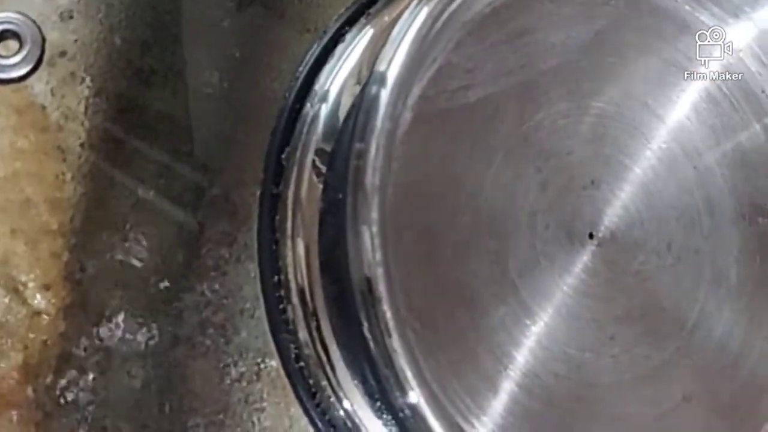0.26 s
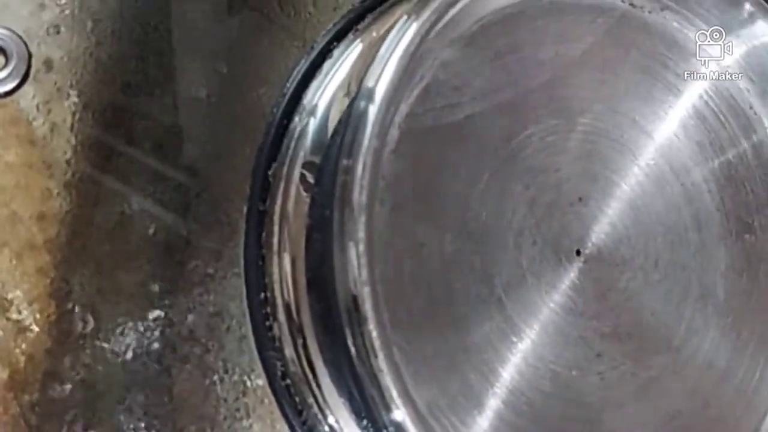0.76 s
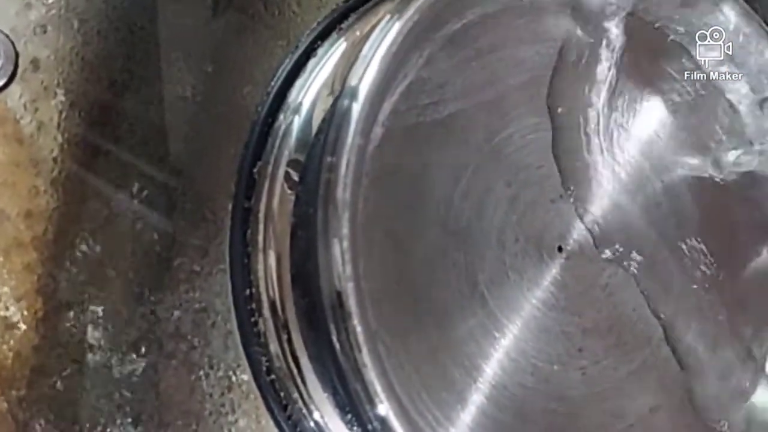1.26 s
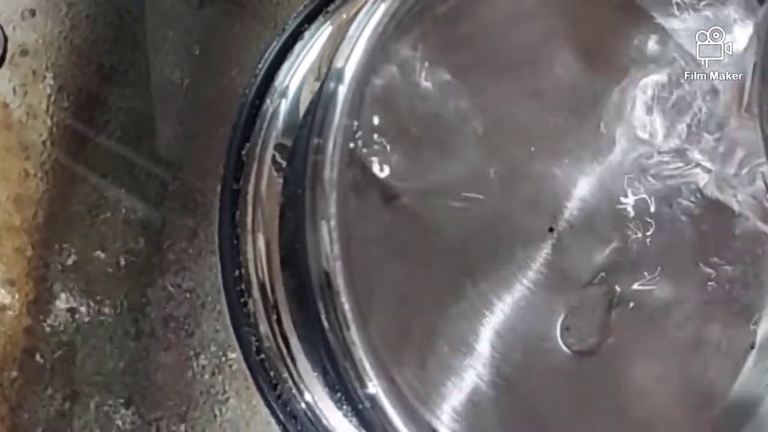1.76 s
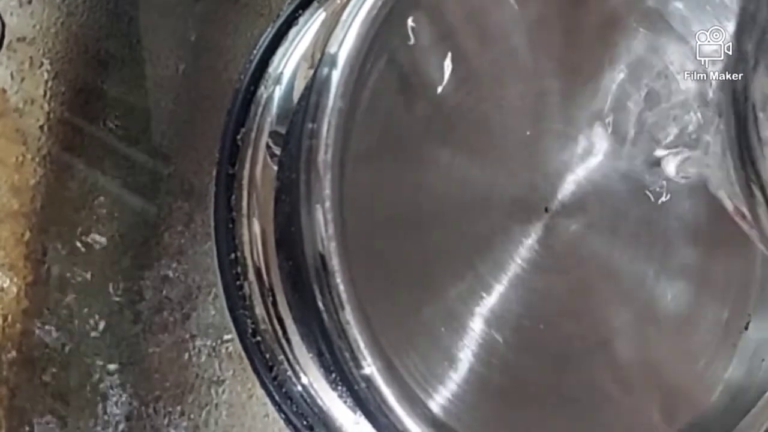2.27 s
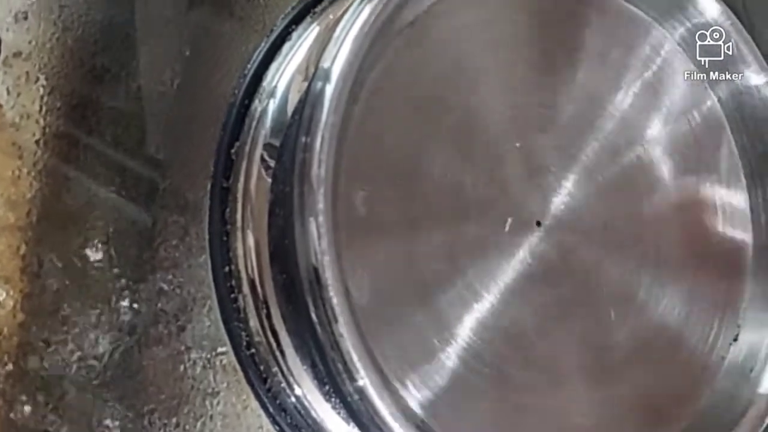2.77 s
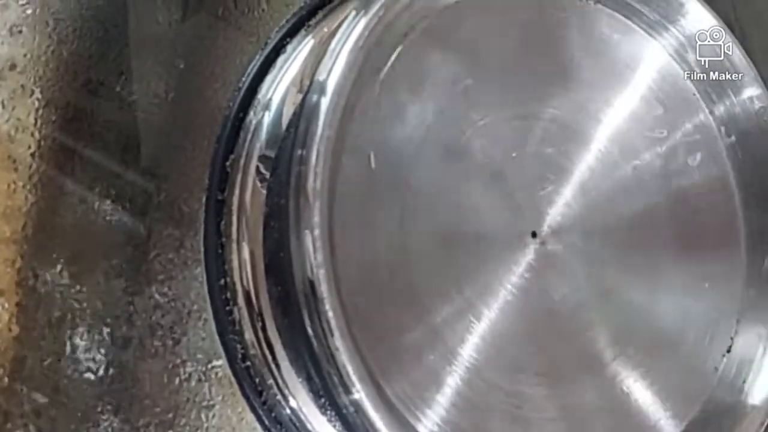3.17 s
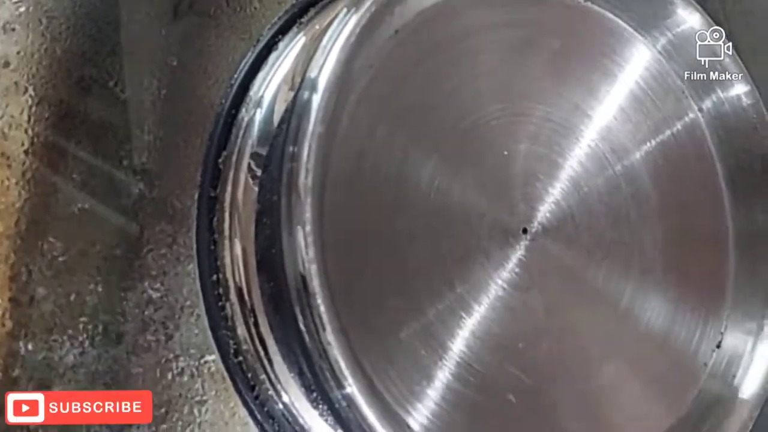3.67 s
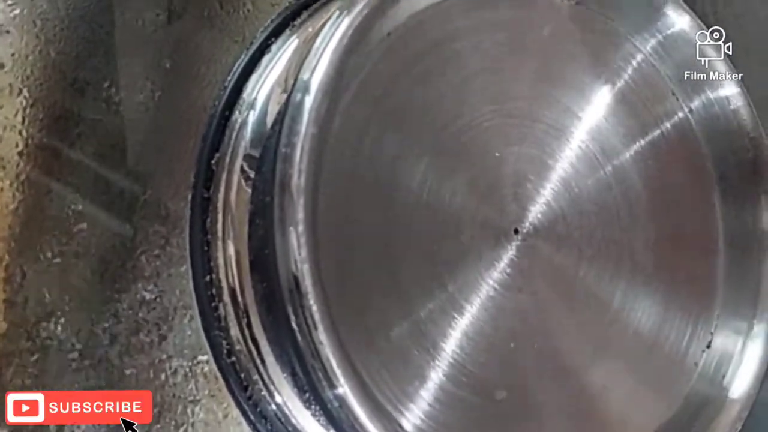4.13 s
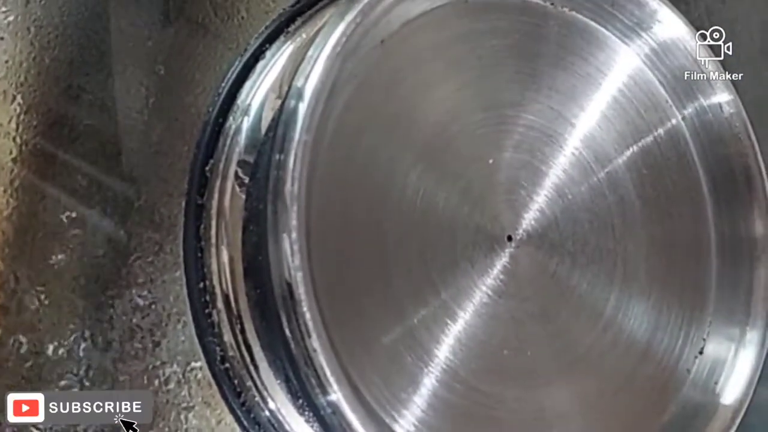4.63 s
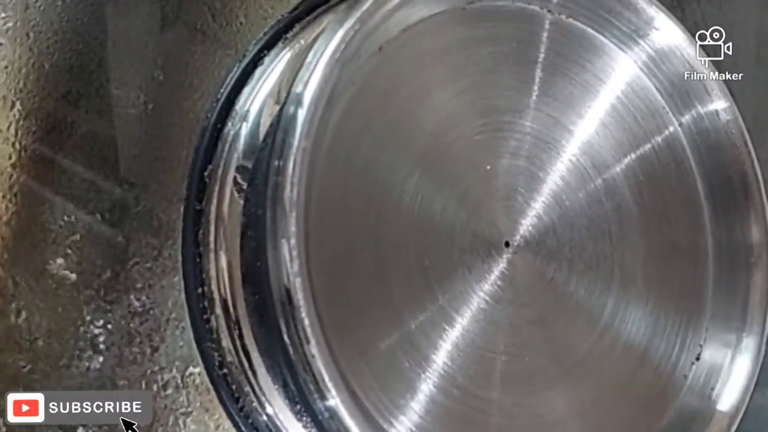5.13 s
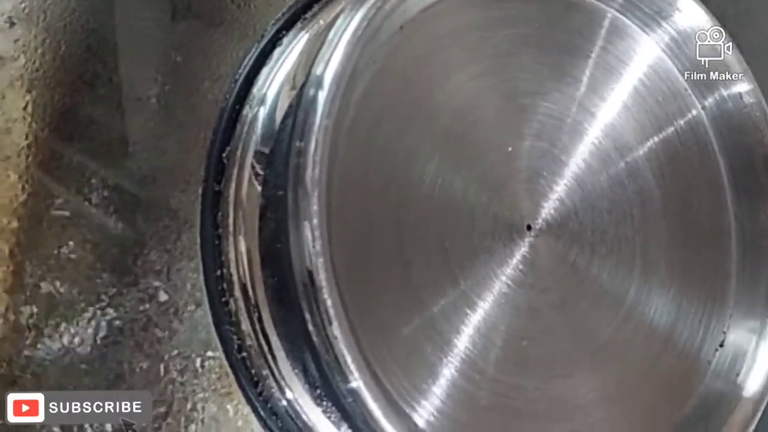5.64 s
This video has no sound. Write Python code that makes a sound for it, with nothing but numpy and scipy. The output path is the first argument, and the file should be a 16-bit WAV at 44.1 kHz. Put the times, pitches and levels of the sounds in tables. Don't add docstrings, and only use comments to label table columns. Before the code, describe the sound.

Dense bubbling sizzle with plinky mid-high pops and small bright spits, held back by a steel lid. A hard metallic knock comes early, then a low thud and faint hollow taps. Brief thin whistles lead into a rush of steam at three seconds, which slowly eases while the frying continues. Low hob rumble, small dry kitchen, close phone microphone with little stereo width.

```python
import sys
import numpy as np
from scipy import signal
from scipy.fft import rfft, irfft
from scipy.io import wavfile

SR = 44100
rng = np.random.default_rng(int(sys.argv[2]) if len(sys.argv) > 2 else 0)


def master(y):
    cut = np.clip(np.atleast_2d(y).T, -1, 1)
    pcm = np.round(cut * 32767)
    wavfile.write(sys.argv[1], SR, pcm.astype(np.int16))


def amplitude_ratio(level_db):
    exponent = np.asarray(level_db, float) / 20
    return 10 ** exponent


N = 260190

# (time [s], level about the mean [dB])
HEAT = [(0, .5), (.45, -1), (1.0, -.5), (1.45, 0.5), (1.85, 1), (2.5, 0), (2.75, -1.5), (3.35, 1), (4.3, 0),
        (5.0, -2.5), (5.9, 0.5)]
# (frequency [Hz], density [dB per Hz])
BUBBLE_SPECTRUM = [(1000, -11), (1500, -11.5), (2100, 0.5), (2500, 1), (3000, 1.5), (4000, -6), (5500, -9),
                   (7500, -17)]
# (frequency [Hz], width [Hz], level [dB])
LID_MODES = [(598, 39, -18.5), (675, 25, -17.5), (1417, 90, -10), (1678, 210, -8.5), (1860, 310, -3),
             (2020, 43, -2), (2110, 115, -0.5), (2200, 25, -3), (2393, 75, -12), (2620, 33, -6.5),
             (2780, 460, -5.5), (2980, 37, -7.5), (3310, 140, -19),
             (3600, 32, -5), (3954, 45, -11), (4460, 90, -10), (4770, 34, -19.5), (5420, 59, -14),
             (6400, 120, -17)]
# (time [s], peak [dB], pitch [Hz])
POPS = [(0.1156, -28, 1950), (0.2074, -23.5, 2230), (0.2937, -34, 2220), (0.3641, -30, 2230),
        (0.415, -29, 2220), (0.7138, -28.5, 1990), (1.1409, -29, 1990), (1.2212, -28, 2143),
        (1.553, -30, 2020), (1.8084, -31, 2200), (1.9151, -33, 1980), (2.3492, -28.5, 2010),
        (2.4968, -28.5, 2070), (2.5921, -27, 2200), (2.6505, -25.5, 2040), (3.4302, -29, 2100),
        (3.5335, -29, 2050), (3.7694, -27.5, 2100), (4.0707, -27, 2110), (4.4264, -27.5, 2220),
        (4.8854, -26, 2140), (5.2067, -40, 2190), (5.5638, -35, 1950), (5.6048, -28.5, 2110),
        (5.8113, -32, 2220), (5.8721, -34, 2200), (1.1204, -28, 2170), (2.4603, -26, 2110),
        (2.6868, -27, 2050), (4.1874, -28.5, 2050),
        (0.1446, -26.5, 2530), (0.2359, -36, 2620), (0.4693, -27, 3440), (0.6814, -31, 2590),
             (1.0167, -28.5, 3570), (1.2741, -38, 2700), (1.315, -29, 3600), (1.3823, -25, 2850),
             (1.4552, -28.5, 2650), (1.5589, -27.5, 2730), (1.8947, -28, 3110), (1.983, -29, 3650),
             (2.0957, -27, 3750), (2.1222, -32, 2610), (2.3317, -31, 2570), (3.1892, -27, 3610),
             (3.3444, -28, 3030), (3.9575, -31, 3580), (4.0154, -28, 3680), (4.0977, -39, 2510),
             (4.1665, -27, 2740), (4.4668, -24, 2750), (4.5287, -33, 2610), (4.6025, -26.5, 3560),
             (4.8829, -28, 2780), (5.1478, -26.5, 2980), (5.507, -33, 2700), (5.8113, -35, 2470)]
# (time [s], peak [dB], lowest frequency [Hz])
SPITS = [(.3296, -58, 7000), (1.3593, -43, 10000), (1.4326, -60, 10000), (1.8003, -52, 10000),
         (2.4149, -64, 9500), (2.679, -58, 11500), (2.81, -51, 10500), (3.57, -58, 9000),
         (3.7594, -58, 8000), (4.1754, -57, 9000), (4.2273, -54, 8400), (4.4717, -32, 7000),
         (4.5296, -52, 7000), (4.9067, -46, 5500)]
# (frequency [Hz], density [dB per Hz])
FIZZ_SPECTRUM = [(1470, -14.5), (2500, -2), (2680, -5.5), (3420, 0.5), (3500, -6.5), (3720, 1),
                 (4710, -3.5), (6440, -10), (8280, -23.5), (9360, -33.5), (11200, -29.5), (14000, -77),
                 (15500, -61)]
# (time [s], level [dB])
GAP = [
    (0, -61),
    (1.9, -60),
    (2.7, -54),
    (3.0, -46),
    (3.55, -44),
    (4.3, -47.5),
    (4.9, -49),
    (5.9, -51.5),
]
# (time [s], rise [s], hold [s], level [dB])
SURGES = [
    (2.991, 0.017, 0.02, -40.5),
    (3.114, 0.092, 0.14, -39.5),
    (3.86, 0.015, 0.033, -54),
]
# (frequency [Hz], density [dB per Hz])
STEAM_SPECTRUM = [(290, -32), (600, 1.5), (900, -7.5), (1500, 2.5), (5510, 1.5), (8900, -15.5),
                  (10000, -19), (15500, -34)]
# (frequency [Hz], density [dB per Hz])
LOW_STEAM_SPECTRUM = [(180, -5), (300, -2.5), (434, -6), (580, 1.5), (629, -5), (669, -4.5), (1500, -1.5),
                      (1950, -19), (3300, -120)]
# (time [s], length [s], level [dB])
WHISTLES = [(2.04, .07, -44), (2.15, .04, -55), (2.24, .07, -48), (2.42, 0.041, -62), (2.53, .04, -55),
            (2.66, 0.089, -47), (2.84, 0.055, -42.5), (3.693, .06, -48), (5.72, .04, -40)]
# (frequency [Hz], level [dB], t60 [s])
KNOCK_MODES = [(420, -31.5, 0.1), (733, -20, 0.047), (795, -31, .03), (970, -6, 0.0082), (1030, -32, 0.029),
               (1170, -21.5, 0.024), (1726, -16.5, 0.04), (2000, -25, .04), (2236, -18, 0.038),
               (2200, -16.5, 0.011), (2380, -30, 0.066), (3290, -20, 0.012), (3700, -27.5, .025),
               (4800, -20, 0.019)]
# (frequency [Hz], level [dB], t60 [s])
HOB_MODES = [(87, -45, 0.65), (141, -25.5, 0.13), (128, -38.5, 0.64), (164.5, -18, 0.057),
             (228, -28.5, 0.075)]
# (frequency [Hz], level [dB], t60 [s])
THUD_MODES = [(121.2, -37, 0.37), (152, -29.5, 0.051), (185, -26, 0.059), (278, -38, .03),
              (1270, -28.5, 0.024)]
# (time [s], peak [dB], pitch [Hz], t60 [s])
TAPS = [
    (1.668, -25.5, 647, 0.038),
    (1.683, -41, 592, 0.045),
    (3.967, -29, 664, 0.062),
    (3.994, -36, 717, 0.04),
    (5.475, -39, 693, 0.053),
]
# (frequency [Hz], density [dB per Hz])
RUMBLE_SPECTRUM = [(15, -31), (25, -21), (48, -12), (70, -5.5), (118, 4), (151, -1), (178, 4.5), (199, -13),
                   (235, 1), (317, -17), (400, -8), (520, -29), (880, -120)]
# (frequency [Hz], level [dB])
HUMS = [(597.3, -66), (171.4, -67.5), (125.5, -80), (43.2, -56.5)]
# (frequency [Hz], side minus mid [dB])
WIDTH = [(60, -19), (300, -26), (900, -36), (2200, -15), (4200, -19), (5500, -47), (15000, -40)]
# (frequency [Hz], level [dB])
LEAN = [(8000, -37.5), (10000, -19), (11800, -16), (13500, -3), (15500, -1)]

KNOCK_S, THUD_S = .8847, 1.3735
POP_CYCLES, POP_DB = 84, 3
WEAK_POPS, WEAK_POP_DB, WEAK_POP_HZ = 40, -37, 2100
SIZZLE_DB, FIZZ_DB, PORT_HISS_DB = -43.5, -46.5, -73
SURGE_T60_S = 0.52
WHISTLE_HZ, WHISTLE_T60_S = 3627, 0.055
LOW_STEAM_DB, LOW_STEAM_SHARE_DB = -55.5, -8.5
RUMBLE_DB, RUMBLE_SHARE_DB = -56, -19
HANDLING_S, HANDLING_WIDTH_S, HANDLING_DB = 1.42, .15, 5


def rms_one(x):
    return x / np.sqrt(np.mean(x ** 2) + 1e-20)


def in_time(rows):
    s, *columns = np.transpose(rows)
    return [np.interp(np.arange(N) / SR, s, c) for c in columns]


def at_hz(points, hz):
    point_hz, level = np.array(points).T
    return np.interp(np.log(hz), np.log(point_hz), level)


def colour(x, spectrum):
    hz = np.arange(1, N // 2 + 2) * SR / N
    return irfft(rfft(x) * amplitude_ratio(at_hz(spectrum, hz)), N)


def cut(x, hz, kind):
    sos = signal.butter(4, np.clip(hz, 10, .45 * SR), kind, fs=SR, output="sos")
    return signal.sosfilt(sos, x)


def drift(rate):
    r = np.exp(-80 * np.pi * rate / SR)
    noise = rng.standard_normal(N // 40 + 2002)
    slow = signal.lfilter([1], [1, -2 * r, r * r], noise)[2000:]
    return np.interp(np.arange(N) / 40, np.arange(len(slow)), rms_one(slow))


def grains(per_s, spread_db, clump_db):
    sizes = amplitude_ratio(spread_db * np.minimum(rng.exponential(1, N), 5)) * rng.choice([-1, 1], N)
    return sizes * (rng.random(N) < per_s * amplitude_ratio(clump_db * drift(14)) / SR)


def ring(clicks, hz, t60):
    r, w = amplitude_ratio(-60 / (t60 * SR)), 2 * np.pi * hz / SR
    return signal.lfilter([0, np.sin(w)], [1, -2 * r * np.cos(w), r * r], clicks + 1e-18)


def swell(clicks, hz, t60, rise_s):
    return rms_one(ring(ring(clicks, hz, rise_s), hz, t60))


def burst(hz, t60, rise_s, glide):
    t = np.arange(int(.35 * SR)) / SR
    tone = np.sin(2 * np.pi * hz * (t + glide * t ** 2))
    return tone * amplitude_ratio(-60 * t / t60) * (1 - np.exp(-t / rise_s))


def add(out, s, sound):
    i = round(s * SR)
    out[i:i + len(sound)] += sound[:N - i]


def sizzle():
    clicks = grains(per_s=3000, spread_db=3.5, clump_db=2.5)
    size_class = rng.integers(0, 36, N)
    bubbles = 0
    for k, hz in enumerate(np.geomspace(1150, 7500, 36)):
        level = amplitude_ratio(at_hz(BUBBLE_SPECTRUM, hz)) * np.sqrt(hz)
        bubbles = bubbles + level * swell(clicks * (size_class == k), hz, 100.0 / hz, rise_s=0.0061)

    lid_bursts = grains(per_s=900, spread_db=3.5, clump_db=2.5)
    lid = 0
    for hz, width_hz, level_db in LID_MODES:
        reaches = rng.random(N) < .3
        struck = lid_bursts * reaches * amplitude_ratio(2.13 * drift(9.1))
        t60 = np.log(1000) / np.pi / width_hz
        lid = lid + amplitude_ratio(level_db) * swell(struck, hz, t60, rise_s=0.01)
    return amplitude_ratio(-3.5) * rms_one(bubbles) + amplitude_ratio(1) * rms_one(lid)


def pops():
    out = np.zeros(N)
    scatter = rng.uniform([0, -5, -120], [N / SR, 5, 120], (WEAK_POPS, 3))
    weak = [0, WEAK_POP_DB, WEAK_POP_HZ] + scatter
    rows = np.vstack([POPS, weak])
    shapes = rng.uniform([.84, 1.06, -.5], [.95, 1.3, 3], (len(rows), 3))
    for (s, db, hz), (below, above, glide) in zip(rows, shapes):
        t60 = POP_CYCLES / hz
        add(out, s, amplitude_ratio(db + POP_DB) * burst(hz, t60, 0.0032, glide))
        neighbours = burst(hz * below, 0.93 * t60, 0.0015, glide)
        neighbours = neighbours + burst(hz * above, 0.76 * t60, 0.00094, glide)
        add(out, s, amplitude_ratio(db + POP_DB - 8) * neighbours)
    return out


def spits():
    out = np.zeros(N)
    t = np.arange(1300) / SR
    for s, db, low_hz in SPITS:
        puff = rng.standard_normal(1300) * amplitude_ratio(-60 * t / 0.032) * np.minimum(t / .003, 1)
        puff = cut(puff, low_hz, "high")
        for _ in range(2):
            puff = cut(puff, 1.22 * low_hz, "low")
        add(out, s - .002, amplitude_ratio(db) * puff)
    return out


def leak():
    t = np.arange(N) / SR
    power = amplitude_ratio(in_time(GAP)[0]) ** 2
    for s, rise_s, hold_s, db in SURGES:
        rise = np.clip((t - s) / rise_s, 0, 1)
        fade_db = -60 * np.maximum(t - s - rise_s - hold_s, 0) / SURGE_T60_S
        power = power + (rise * amplitude_ratio(db + fade_db)) ** 2
    return np.sqrt(power)


def hiss(spectrum, grit, flicker_db):
    fine = rms_one(grains(per_s=2300, spread_db=8.5, clump_db=2.0))
    source = rng.standard_normal(N) + grit * fine
    flicker = amplitude_ratio(flicker_db * (0.11 * drift(6.0) + drift(39)))
    return rms_one(colour(source, spectrum) * flicker)


def whistles():
    t = np.arange(N) / SR
    spells = 0
    for s, length_s, db in WHISTLES:
        arch = np.sin(np.pi * np.clip((t - s) / length_s, 0, 1)) ** .5
        spells = spells + amplitude_ratio(db) * arch
    tone = rms_one(ring(rng.standard_normal(N), WHISTLE_HZ, WHISTLE_T60_S))
    return np.nan_to_num(spells) * tone


def blows():
    out = np.zeros(N)
    for hz, db, t60 in KNOCK_MODES:
        add(out, KNOCK_S, -amplitude_ratio(db) * burst(hz, t60, 0.37 / hz, 0))
    crack = rng.standard_normal(900) * amplitude_ratio(-60 * np.arange(900) / SR / 0.038)
    add(out, KNOCK_S, amplitude_ratio(-15.0) * crack)
    for hz, db, t60 in HOB_MODES:
        add(out, KNOCK_S + 0.0027, -amplitude_ratio(db) * burst(hz, t60, 0.0045, 0))
    for hz, db, t60 in THUD_MODES:
        add(out, THUD_S, amplitude_ratio(db) * burst(hz, t60, 0.0021, 0))
    for s, db, hz, t60 in TAPS:
        for ratio, share in [(.88, 0.38), (1, 0.97), (1.17, .5), (1.33, 0.27)]:
            add(out, s, amplitude_ratio(db - 1.5) * share * burst(ratio * hz, t60, 0.003, 0))
    return cut(out, 4150, "low")


def kitchen(x, t60):
    t = np.arange(int(.4 * SR)) / SR
    tail = rng.standard_normal(len(t)) * amplitude_ratio(-60 * t / t60) * np.minimum(t / 0.0013, 1)
    tail = signal.lfilter([.3], [1, -.7], tail)
    return signal.fftconvolve(x, tail / np.sqrt(np.sum(tail ** 2)))[:N]


def rumble(escape):
    t = np.arange(N) / SR
    shake_db = HANDLING_DB * np.exp(-((t - HANDLING_S) / HANDLING_WIDTH_S) ** 2)
    level = np.hypot(amplitude_ratio(RUMBLE_DB + shake_db), amplitude_ratio(RUMBLE_SHARE_DB) * escape)
    return level * hiss(RUMBLE_SPECTRUM, grit=0.055, flicker_db=0.5)


def hums():
    return sum(amplitude_ratio(db) * rms_one(ring(rng.standard_normal(N), hz, 0.62)) for hz, db in HUMS)


def scene():
    heat_db, = in_time(HEAT)
    frying = amplitude_ratio(SIZZLE_DB + heat_db) * sizzle() + pops()
    pan = cut(frying, 5870, "low") + spits()
    fizz = amplitude_ratio(FIZZ_DB) * hiss(FIZZ_SPECTRUM, grit=0.31, flicker_db=1.24)

    escape = leak()
    low = np.hypot(amplitude_ratio(LOW_STEAM_DB), amplitude_ratio(LOW_STEAM_SHARE_DB) * escape)
    steam = escape * hiss(STEAM_SPECTRUM, grit=0.31, flicker_db=0.54)
    steam = steam + low * hiss(LOW_STEAM_SPECTRUM, grit=0.22, flicker_db=1.0)

    struck = blows()
    room = amplitude_ratio(-18.0) * kitchen(cut(struck, 150, "high"), t60=0.21)
    mid = pan + fizz + steam + whistles() + struck + room + rumble(escape) + hums()

    patches = np.clip(3 * (0.42 * drift(5.2) + 0.88 * drift(23.7) - .6), 0, 1)
    late = np.pad(mid, (130, 0))[:N]
    apart = patches * colour(late, WIDTH) + colour(mid, LEAN) + amplitude_ratio(-38) * np.roll(struck, 40)
    return np.array([mid + apart, mid - apart])


def top_cut(x):
    return signal.sosfilt(signal.butter(12, 15640, fs=SR, output="sos"), x)


def record(dry):
    port_hiss = amplitude_ratio(PORT_HISS_DB) * cut(rng.standard_normal(N), 6400, "high")
    mix = cut(dry, 51, "high") + port_hiss * [[1], [0]]
    return top_cut(mix)


dry = scene()
out = record(dry)
master(out)
```